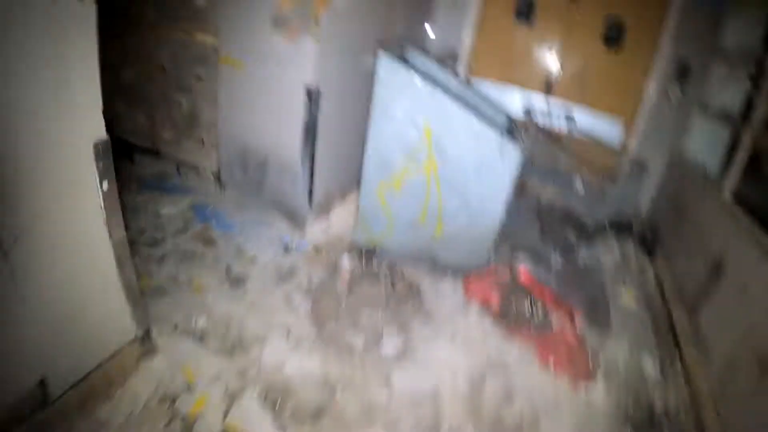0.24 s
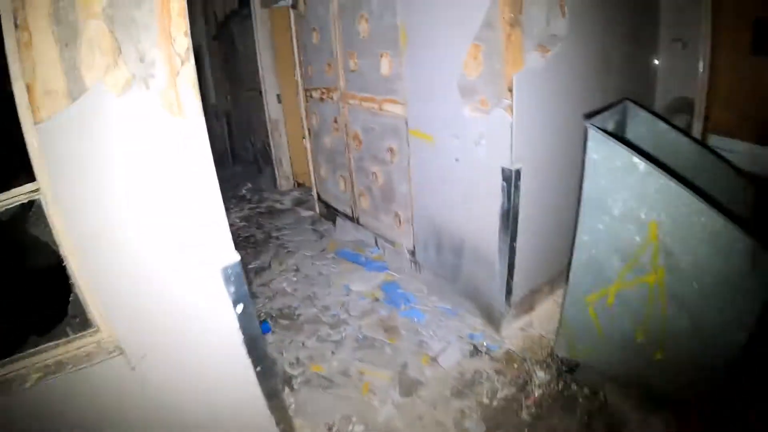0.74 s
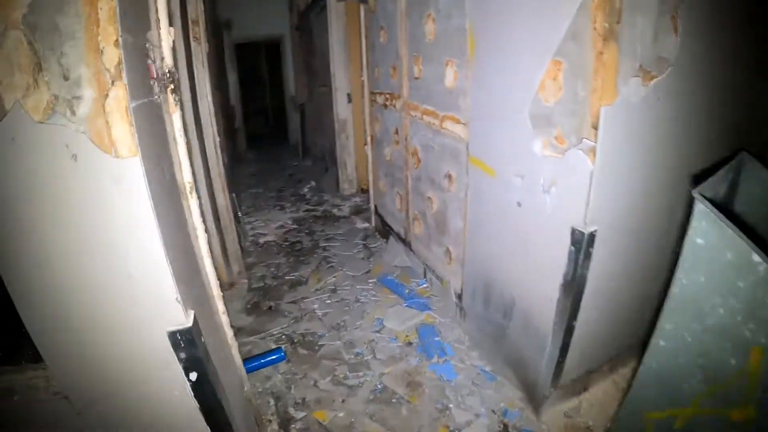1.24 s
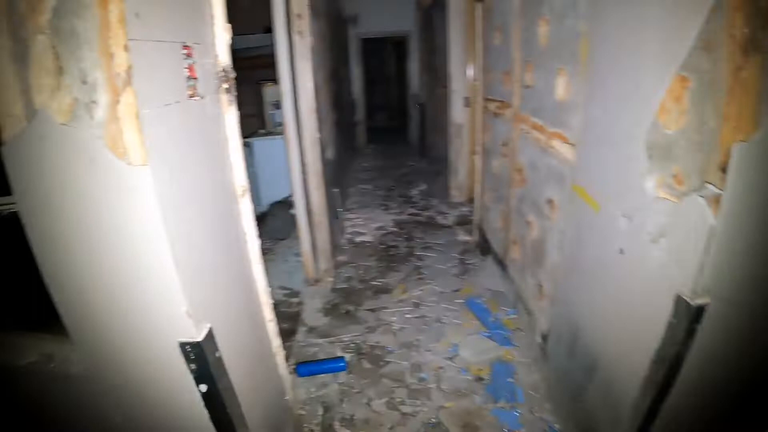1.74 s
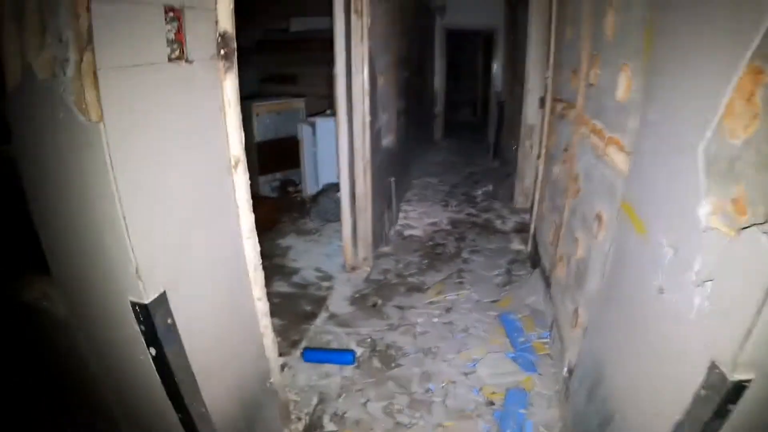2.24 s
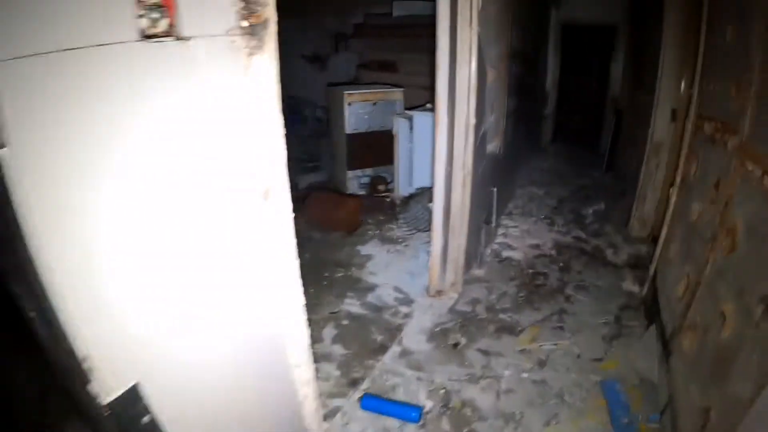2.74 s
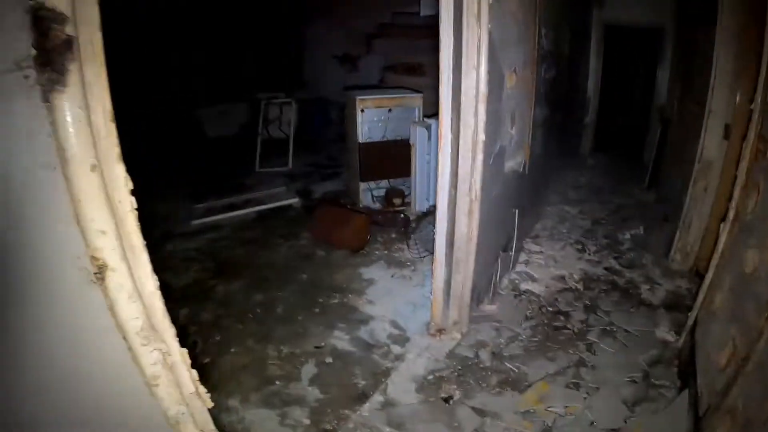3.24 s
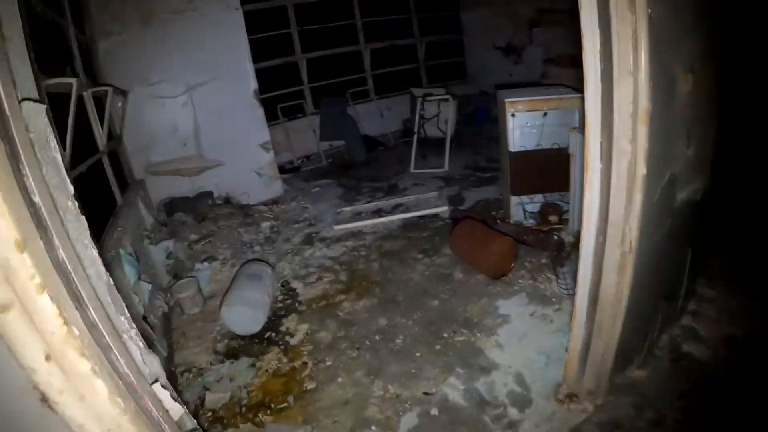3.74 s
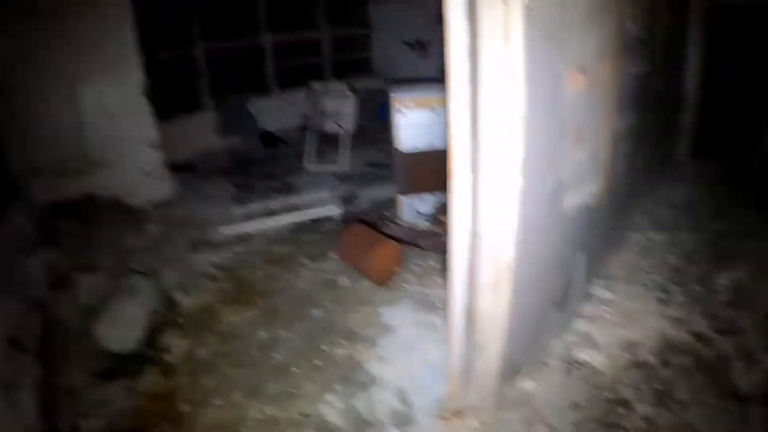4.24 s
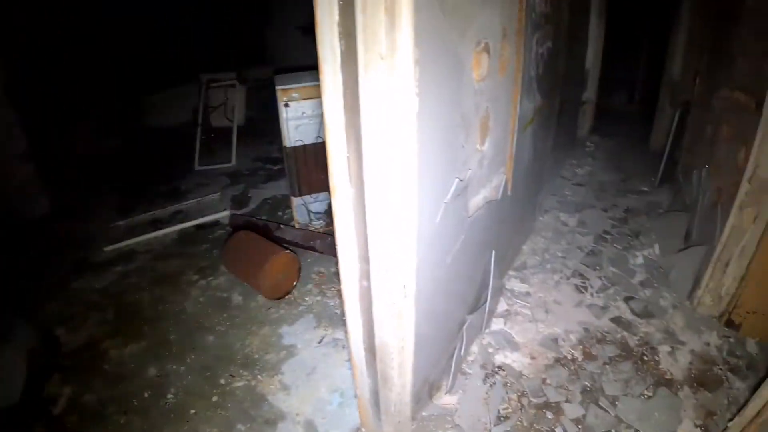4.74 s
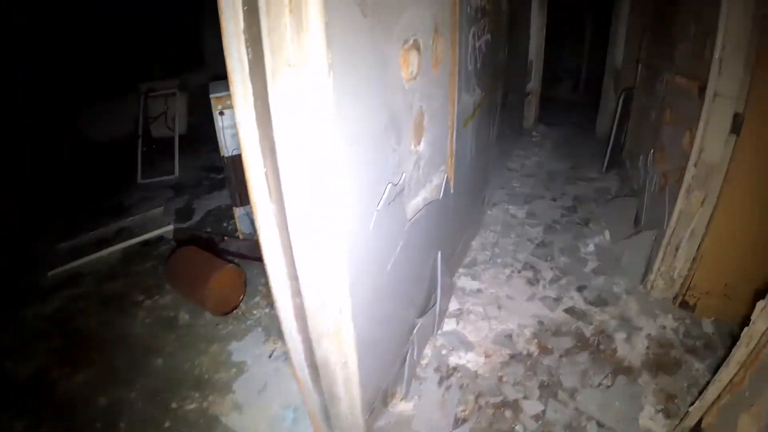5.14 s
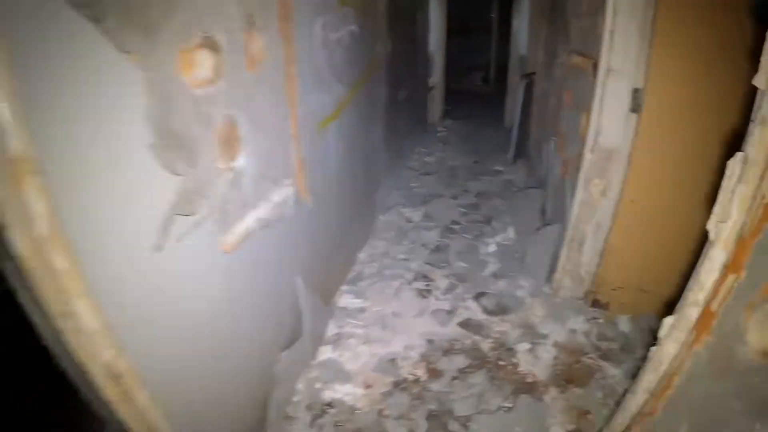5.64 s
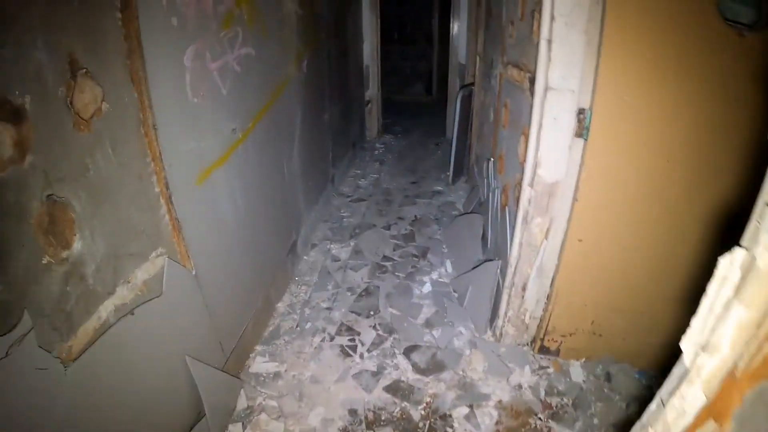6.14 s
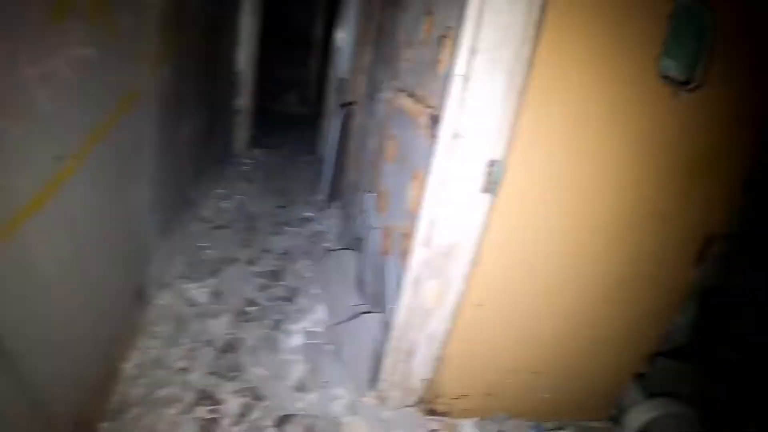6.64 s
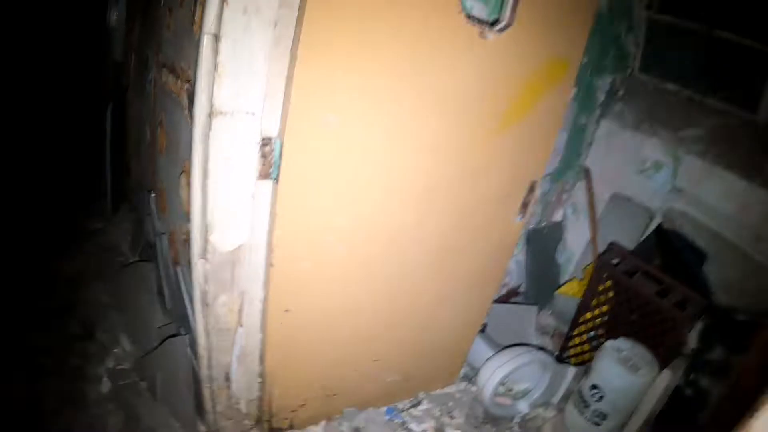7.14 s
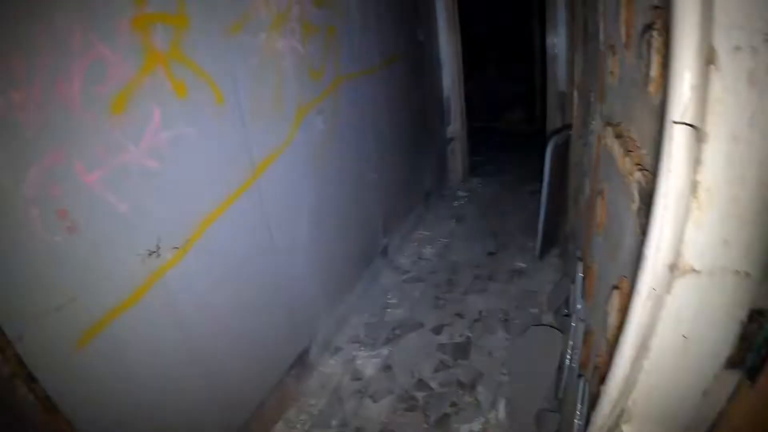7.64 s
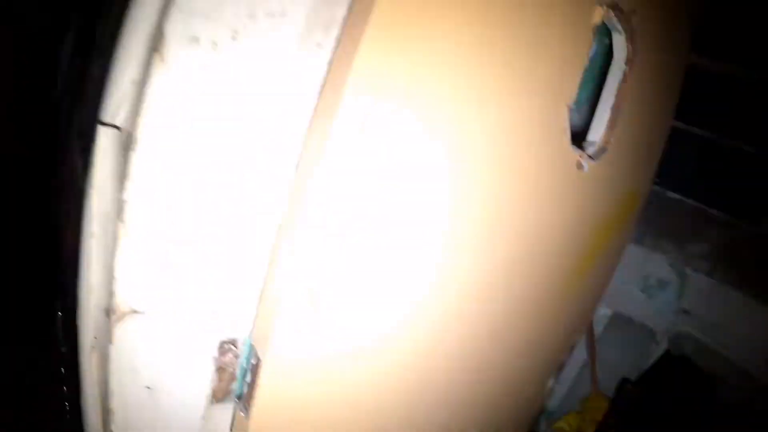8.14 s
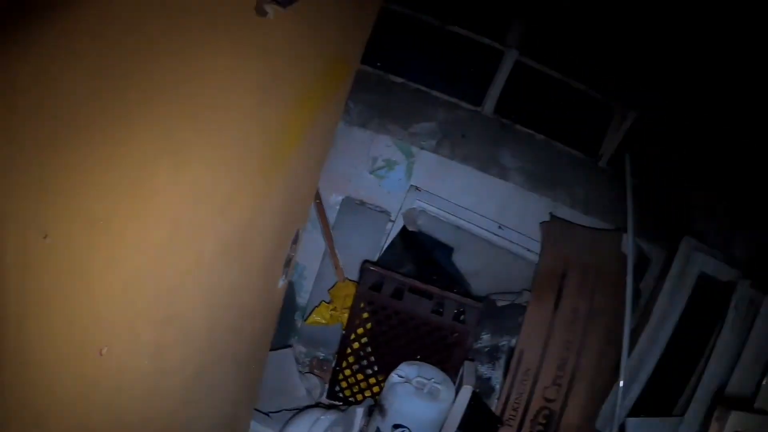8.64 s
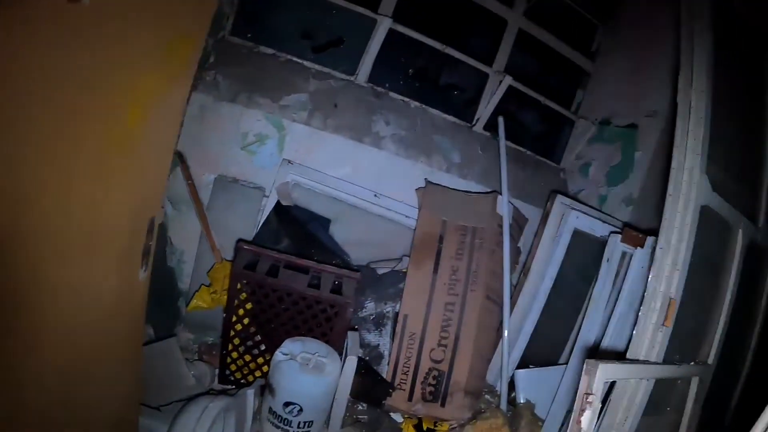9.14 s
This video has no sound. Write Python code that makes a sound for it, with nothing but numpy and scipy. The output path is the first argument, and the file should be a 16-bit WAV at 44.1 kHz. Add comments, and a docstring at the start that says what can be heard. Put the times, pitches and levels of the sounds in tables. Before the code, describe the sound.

Someone walks cautiously through a derelict hallway, debris snapping and scraping underfoot, glass bits clinking, with soft thuds and short hard echoes.

```python
"""A short low hum and a soft scuff open over a lumpy rumble; then someone walks slowly over plaster,
rubble and broken glass in a bare corridor. Lumps crack as filtered bursts of noise, grit crunches as many
tiny ringing snaps, shards ring as dying sines, and fading noise makes the corridor's echo.
The moving hand and air put the rumble on the microphones; thuds carry the weight of the feet."""
import sys
import numpy as np
from scipy import signal
from scipy.fft import rfft, irfft, next_fast_len
from scipy.io import wavfile

SR = 44100
rng = np.random.default_rng(int(sys.argv[2]) if len(sys.argv) > 2 else 0)


def pcm_store(signal):
    """Save signal as 16-bit PCM."""
    levels = np.round(np.clip(np.atleast_2d(signal), -1, 1) * 32767)
    wavfile.write(sys.argv[1], SR, levels.astype(np.int16).T)


def gain_from_db(level_db):
    """Turn a decibel level (scalar or array-like) into a linear amplitude factor."""
    decades = np.asarray(level_db, float) / 20
    return 10 ** decades


N = 413658   # length in samples

# Tone colour of the floor sounds as the microphones hear them: little bass, fading high treble.
# Each row: frequency in Hz, relative level in dB.
FLOOR_COLOUR_AT_MICS = [(180, -47), (300, -38.5), (549, -71), (912, -4), (3370, -8.5), (5420, -7),
                        (7760, -14.5), (8700, -20.5), (10100, -22.5), (14900, -38)]


def rms_one(x):
    """Scales a sound to an rms of 1."""
    return x / np.sqrt(np.mean(x ** 2) + 1e-20)


def at_hz(points, hz):
    """Reads a table of (Hz, value) at any frequency, along a logarithmic pitch scale."""
    table_hz, values = np.transpose(points)
    return np.interp(np.log(hz + 1), np.log(table_hz), values)


def band(x, low_hz, high_hz):
    """Keeps the part between two frequencies."""
    edges = [low_hz, min(high_hz, .45 * SR)]
    return signal.sosfilt(signal.butter(2, edges, "band", fs=SR, output="sos"), x)


def split(x, hz):
    """The parts below and above a frequency."""
    return [signal.sosfilt(signal.butter(4, hz, kind, fs=SR, output="sos"), x) for kind in ("low", "high")]


def coloured(x, spectrum):
    """Filters a sound by a table of (Hz, dB)."""
    length = x.shape[-1]
    size = next_fast_len(length)
    gain = gain_from_db(at_hz(spectrum, np.fft.rfftfreq(size, 1 / SR)))
    return irfft(rfft(x, size) * gain, size)[..., :length]


def drift(rate_hz):
    """A slow random wander of rms about 1: noise smoothed twice, worked out at every 40th sample."""
    r = np.exp(-80 * np.pi * rate_hz / SR)
    noise = rng.standard_normal(N // 40 + 2002)
    slow = signal.lfilter([1], [1, -2 * r, r * r], noise)[2000:]   # drop the filter's start
    return np.interp(np.arange(N) / 40, np.arange(len(slow)), rms_one(slow))


def ring(clicks, hz, t60):
    """Each unit click starts a sine of height 1 that falls 60 dB in t60 seconds."""
    r = gain_from_db(-60 / (t60 * SR))
    w = 2 * np.pi * hz / SR
    return signal.lfilter([0, np.sin(w)], [1, -2 * r * np.cos(w), r * r], clicks + 1e-18)


def pair(side_db):
    """Two channels of noise: a shared middle, plus a side part of opposite sign in each."""
    mid, side = rng.standard_normal((2, N))
    return mid + gain_from_db(side_db) * side * [[1], [-1]]


def presses(rows):
    """Rows of (s, rise s, fall s, dB, ..): a straight rise, a dying fall; one gain curve per dB column."""
    gains = np.zeros((len(rows[0]) - 3, N))
    for s, rise, fall, *db in rows:
        t = np.arange(N - round(s * SR)) / SR
        shape = np.minimum(t / rise, np.exp((rise - t) / fall))
        gains[:, N - len(t):] += gain_from_db(np.array(db))[:, None] * shape
    return gains


def snaps(per_s, spread_db, clump_db, low_hz, cycles):
    """Random snaps in clumps, each ringing down 60 dB in some cycles at one of 24 pitches; rms 1."""
    sizes = gain_from_db(spread_db * np.minimum(rng.exponential(1, N), 5)) * rng.choice([-1, 1], N)
    born = rng.random(N) < per_s * gain_from_db(clump_db * drift(25)) / SR
    pitches = np.geomspace(low_hz, 13000, 24)
    pitches = pitches * gain_from_db(0.11 * rng.standard_normal(24))   # slightly out of step
    dealt = rng.integers(0, 24, N)   # which pitch a snap gets
    total = np.zeros(N)
    for k, hz in enumerate(pitches):
        ringing = ring(sizes * born * (dealt == k), hz, cycles / hz)
        total += rms_one(ringing) * np.sqrt(hz)
    return rms_one(total)


def hums(sag=1.7):
    """Low sine tones that swell, sag and stop within a fifth of a second."""
    # Short hums. Each row: start in seconds, frequency in Hz, level in dB, length in seconds.
    tones = [(0.0, 163, -27, 0.07), (0.075, 329, -35, 0.13), (0.376, 55.2, -24, 0.11),
             (2.027, 97.6, -24.5, 0.16), (5.375, 107, -36.5, 0.12), (5.624, 243.4, -24.5, 0.11),
             (8.514, 315, -29, 0.081)]
    out = np.zeros(N)
    for s, hz, db, length in tones:
        t = np.arange(round(length * SR)) / SR
        shape = np.sqrt(np.sin(np.pi * t / length)) * np.exp(-sag * t / length)
        at = round(s * SR)
        out[at:at + len(t)] += gain_from_db(db) * shape * np.sin(2 * np.pi * hz * t)
    return out


def rumble(lumpy_db=3.0):
    """Moving air and hand shake the microphones: lumpy noise in a deep and an upper band."""
    # Strength of the deep rumble, joined by straight lines. Each row: time in seconds, level in dB.
    strength = [(0.0, -45.5), (0.29, -54.5), (0.42, -30.5), (0.65, -66.5), (1.1, -34), (1.51, -52),
                (2.48, -41.5), (2.59, -63), (2.82, -50.5), (4.23, -64), (4.44, -52), (6.53, -58.5),
                (6.82, -41), (6.87, -54), (8.1, -48.5), (8.15, -38), (9.33, -73.5), (9.38, -58.5)]
    seconds, levels = np.transpose(strength)
    deep_db = np.interp(np.arange(N) / SR, seconds, levels)
    upper_db = -60.5 + 0.11 * (deep_db - deep_db.mean())   # follows a small share of the deep swing
    deep = rms_one(band(band(pair(-13.0), 11, 65), 5, 100))
    upper = rms_one(band(band(pair(-9), 110, 330), 140, 560))
    deep = deep * gain_from_db(deep_db + lumpy_db * drift(9.7))
    return deep + upper * gain_from_db(upper_db + lumpy_db * drift(12.0))


def still_air(level_db=-64):
    """The quiet air of the building: steady coloured noise."""
    # Tone colour of the quiet air. Each row: frequency in Hz, relative level in dB.
    air_colour = [(59, -23), (100, 1.5), (176, 12.5), (731, -21.5), (1000, -0.5), (3450, -18.5),
                  (7170, -19.5), (14900, -48)]
    return gain_from_db(level_db) * rms_one(coloured(pair(-8.0), air_colour))


def thuds(rise_s=0.016):
    """The floor booms and the rubble knocks dully under the body's weight: two bands of swelling noise."""
    # The foot coming down. Each row: start in seconds, fall in seconds, boom level in dB, knock level in dB.
    steps = [(0, 0.096, -37, -56.5), (.41, 0.11, -52, -48), (0.951, 0.24, -45.5, -41),
             (1.06, 0.12, -34.5, -40), (1.675, 0.12, -40, -26.5), (1.995, 0.095, -30.5, -32.5),
             (2.3, 0.14, -43, -56), (2.732, 0.16, -41.5, -49.5), (3.48, 0.15, -42, -55),
             (3.695, 0.038, -55, -30), (4.37, 0.082, -51, -55.5), (4.62, 0.098, -44, -41),
             (5.6, 0.095, -33.5, -42), (6.769, 0.036, -41.5, -51), (7.465, 0.069, -55, -41),
             (8.09, 0.29, -46, -68), (8.799, 0.11, -47, -45.5)]
    boom, knock = presses([(s, rise_s, fall, boom_db, knock_db) for s, fall, boom_db, knock_db in steps])
    boom_noise = rms_one(band(band(pair(-19.0), 100, 299), 98, 660))
    knock_noise = rms_one(band(pair(-15.0), 130, 1100))
    return boom * boom_noise, knock * knock_noise


def grit(splinter_db=-4, dust_db=-12, pebble_db=1.5, firm_db=-47, sole_db=-12.5):
    """Crumbs snap, pebbles click, splinters tinkle; a light scuff stirs mostly dust, a firm one breaks grains."""
    # Soles pressing and sliding in the grit. Each row: start in seconds, rise in seconds,
    # fall in seconds, level in dB, treble in dB relative to that level.
    scuffs = [(0, 0.003, 0.082, -51, 1.5), (0.208, 0.024, 0.25, -48, -5), (.38, 0.065, .18, -48.5, -3.5),
              (.712, 0.013, 0.11, -46, -3.5), (0.938, 0.043, 0.12, -47, 7.5), (1.05, 0.059, 0.15, -37, -11),
              (1.54, 0.011, 0.41, -58, 0), (1.673, 0.0062, 0.12, -39.5, 2.5), (2, 0.0025, 0.09, -27, -53),
              (2.732, 0.018, 0.076, -60, -4), (2.868, 0.0029, 0.072, -41, -10.5), (3.1, 0.16, 1, -64.5, -4),
              (3.453, 0.066, 0.18, -30.5, -9), (4.125, 0.0093, 0.081, -34, -9.5),
              (4.299, 0.073, 0.17, -31.5, -7.5), (4.55, 0.094, 0.19, -35.5, -8),
              (5.26, 0.02, 0.54, -58.5, -6), (5.586, 0.033, 0.032, -27.5, 2),
              (5.729, 0.048, 0.067, -22, -8.5), (5.95, 0.026, 0.28, -36.5, -8.5),
              (6.546, 0.016, 0.039, -44, 4.5), (6.671, 0.015, 0.046, -41, -3.5),
              (7.149, 0.067, 0.43, -69, 0.5), (7.368, 0.018, 0.13, -44, 4), (8.198, 0.2, 0.054, -46.5, 2),
              (8.61, 0.0053, 0.073, -47, 5), (8.803, 0.0034, 0.088, -29.5, -6.5)]
    crumbs = snaps(per_s=2500, spread_db=3.5, clump_db=4.0, low_hz=477.5, cycles=18.0)
    splinters = snaps(per_s=91, spread_db=5.5, clump_db=4.0, low_hz=2524, cycles=500.0)
    pebbles = snaps(per_s=350, spread_db=2.5, clump_db=4.0, low_hz=1151.3, cycles=80.0)
    grains = crumbs + gain_from_db(splinter_db) * splinters + gain_from_db(pebble_db) * pebbles
    pressure = presses([(s, rise, fall, db, db + treble_db, db + sole_db)
                        for s, rise, fall, db, treble_db in scuffs])
    firm = pressure[0] / (pressure[0] + gain_from_db(firm_db))   # 0 = light, near 1 = firm
    dust = (1 - firm + gain_from_db(dust_db)) * pair(2.3)
    low, high = split(coloured(firm * grains + dust, FLOOR_COLOUR_AT_MICS), 2400)
    sole = band(band(pair(-16.0), 130, 1100), 130, 2000)   # dull body of the scuff
    return sum(rms_one(part) * gain for part, gain in zip((low, high, sole), pressure))


def cracks(burst_s=0.0037, ring_db=-4, crush_db=-4, crush_follows=0.25, chip_db=-5, big_chip_db=-5.0,
           snap_db=-11, pan_db=1.94):
    """A break is a burst of a few ms: a broad snap, the short ring of the lump and chips clinking above."""
    # Lumps that break or knock. Each row: start in seconds, level in dB, pitch in Hz of the clearest ring
    # (the lump's if low, a chip's if high), treble in dB relative to the level.
    lumps = [(1.062, -18, 754, -15.5), (1.098, -13, 845, -15), (1.118, -13.5, 1050, -24.5),
             (1.135, -13, 4460, 3), (1.684, -24, 3050, -8), (2.003, -9.5, 1000, -29),
             (2.047, -17.5, 1010, -26), (2.869, -23, 2170, -3.5), (2.9, -26.5, 2200, -13),
             (2.942, -33.5, 1793, 2.5), (3.483, -12.5, 1180, -13), (3.49, -8.5, 2900, -16),
             (3.527, -5, 916, -15), (3.562, -7, 856, -11), (3.581, -10.5, 4540, -2),
             (3.594, -7, 917, -26.5), (3.709, -19, 850, -7), (3.728, -24.5, 990, -6), (3.873, -30, 2700, 0),
             (4.126, -8, 1085, -13), (4.329, -11, 2900, -6), (4.39, -10.5, 1420, -3.5),
             (4.425, -8.5, 1330, -8), (4.492, -17.5, 926, 1.5), (4.574, -23.5, 3830, 1.5),
             (4.602, -15, 4280, 3), (4.654, -15, 4050, 1.5), (4.691, -12, 1194, -31),
             (4.771, -19.5, 1418, -7.5), (4.817, -27.5, 1940, -2.5), (5.075, -50.5, 4330, 5.5),
             (5.383, -42.5, 5530, 5), (5.432, -26, 2200, -11.5), (5.61, -15.5, 4400, -0.5),
             (5.63, -7.5, 1500, -4.5), (5.693, -18.5, 5440, -8), (5.898, -19, 2370, 4.5),
             (5.999, -20, 2480, 0.5), (6.056, -24, 3940, 5), (6.117, -21.5, 3900, -9.5),
             (6.155, -30.5, 3580, -2.5), (6.3, -29, 3940, -4.5), (6.477, -35.5, 4730, 3),
             (6.691, -22, 994, -9.5), (6.775, -36.5, 4710, 7.5), (6.803, -29, 2530, -2),
             (7.385, -29.5, 2820, 5.5), (7.471, -6.5, 980, -9.5), (8.214, -39, 4360, 4),
             (8.35, -14, 900, -11), (8.412, -19.5, 927, -22), (8.504, -27.5, 4270, -0.5),
             (8.613, -27, 5200, 4.5), (8.8025, -10.5, 1080, 4)]
    size, lump_cycles, chip_cycles = 3000, 32, 70   # samples; cycles in which a ring falls 60 dB
    out = np.zeros((2, N))
    t = np.arange(size) / SR
    for s, db, hz, treble_db in lumps:
        noise = rng.standard_normal(size)
        drag, bulk, *chips = rng.random(6)
        lasts = burst_s * (.5 + drag)     # some lumps snap clean, some crumble
        burst = noise * t / lasts * np.exp(-2.5 * t / lasts)
        coloured_burst = coloured(burst, FLOOR_COLOUR_AT_MICS)
        low, high = split(coloured_burst, 3570)
        small_chips_hz = 2000 * 3.7 ** np.array(chips)
        clink = sum(ring(coloured_burst, chip_hz, chip_cycles / chip_hz) for chip_hz in small_chips_hz)
        if hz < 1800:
            lump_hz, big_chip_hz = hz, 2000 * 1.5 ** bulk
        else:
            lump_hz, big_chip_hz = 1100 * 1.35 ** bulk, hz
        lump = ring(burst, lump_hz, lump_cycles / lump_hz)
        big_chip = ring(burst, big_chip_hz, chip_cycles / big_chip_hz)
        parts = [(lump, ring_db), (low, crush_db + crush_follows * treble_db),
                 (big_chip, treble_db + big_chip_db), (high, treble_db + snap_db), (clink, treble_db + chip_db)]
        sound = sum(gain_from_db(part_db) * part / np.abs(part).max() for part, part_db in parts)
        sides_db = pan_db * noise[0] * np.array([[1], [-1]])   # a random lean to one side
        at = round(s * SR)
        out[:, at:at + size] += (gain_from_db(db + sides_db) * sound)[:, :N - at]
    return split(out, 592)[1]     # the breaks carry no bass


def shards(ring_share=.26, rattle_db=0.5, uneven_db=1.5):
    """A blow strikes all modes of its group, which ring briefly and are kept sounding by a dying rattle."""
    # Ringing glass: one list of modes per group of rings; a bouncing shard may use several groups.
    # Each row: frequency in Hz, level in dB, time in seconds for the rattle to fall 60 dB.
    ring_groups = [
        [(2126, -2, .22), (3085, -6, .3), (4560, -2, .28), (5852, -16, .3), (6912, -12, .25)],
        [(6632, 0, .4)],
        [(996, -5, .4), (1755, -6, .35), (2105, 1, .5), (2848, -11, .45), (4016, -13, .5), (4511, -8, .33),
         (4786, -13, .45), (5889, -16, .38), (6934, -12, .33)],
        [(5346, 0, 0.2), (7725, -14, 0.2), (10150, -17, 0.13)],
        [(1389, 0, .35), (2560, -2, .2), (3640, -2, .2)],
        [(5959, 0, .3), (7391, -3, .4)],
        [(4000, 0, .25), (2482, -4, .25)],
        [(960, 0, .5)],
        [(1350, 0, .25)],
        [(3550, 0, .3), (4000, 0, .3), (5900, -4, .2), (6800, -8, .2)],
        [(1093, -2, .55), (1669, -7, .5), (2751, -11, .45), (3580, -4, .4), (6212, -3, .3), (7009, -6, .4),
         (7494, -11, .4), (9733, -20, .3), (10440, -20, .2)],
    ]
    # One list of blows per group of rings, in the same order. Each row: time in seconds, level in dB.
    group_blows = [
        [(1.1325, -29.5)],
        [(1.233, -37)],
        [(2.003, -34), (2.047, -31)],
        [(5.694, -18)],
        [(5.611, -32.5), (5.9005, -27.5)],
        [(5.9983, -39), (6.1185, -51.5)],
        [(6.0561, -33), (6.119, -34.5), (6.1554, -39), (6.3001, -45.5)],
        [(7.471, -27.5), (8.351, -39)],
        [(2.727, -45.5)],
        [(4.775, -38)],
        [(8.803, -30.5)],
    ]
    out = np.zeros(N)
    for modes, blows in zip(ring_groups, group_blows):
        s, db = np.transpose(blows)
        at, size = int(s[0] * SR), int((s[-1] - s[0] + 1) * SR)
        for hz, level_db, t60 in modes:
            clicks = np.zeros(size)
            unevenness = uneven_db * rng.standard_normal(len(s))
            clicks[(s * SR).astype(int) - at] = gain_from_db(db + level_db + unevenness)
            dying = signal.lfilter([1], [1, -gain_from_db(-60 / (t60 * SR))], clicks + 1e-18)
            ring_s = ring_share * t60   # a bare ring dies sooner than the rattle
            rattle = dying * rng.standard_normal(size) * gain_from_db(rattle_db) * np.sqrt(10 / (ring_s * SR))
            out[at:at + size] += ring(2 * clicks + 2 * rattle, hz, ring_s)[:N - at]
    return out


def corridor(x, gap_s=0.0022, side_db=-5.0):
    """Dense echoes, dying soonest in the high treble, a little different at each microphone."""
    # How long the echo lasts. Each row: frequency in Hz, time in seconds to fall 60 dB.
    echo_times = [(300, 0.65), (1000, 0.49), (3000, 0.51), (7000, 0.38), (12000, 0.3)]
    t = np.arange(SR) / SR
    edges = np.geomspace(100, 16000, 9)
    noise = pair(side_db)[:, :SR]
    tail = np.zeros((2, SR))
    for low, high in zip(edges, edges[1:]):
        t60 = at_hz(echo_times, np.sqrt(low * high))
        tail += band(noise, low, high) * gain_from_db(-60 * t / t60)
    tail = tail * np.clip(t / gap_s - 1, 0, 1)   # a short gap, then an equally short rise
    tail = tail / np.sqrt(np.sum(tail ** 2) / 2)
    return signal.fftconvolve(x[None], tail, axes=1)[:, :N]


def scene():
    """Debris and knocks echo in the corridor; boom, rumble, hums and still air are added without echo."""
    boom, knock = thuds()
    broken = cracks() + grit() + knock
    rung = shards()
    echoes = corridor(gain_from_db(-5.5) * broken.mean(axis=0) + gain_from_db(-7.5) * rung)
    balance = gain_from_db([[.6], [-.6]])   # dB: first channel a little louder
    return balance * (broken + rung + echoes) + boom + rumble() + hums() + still_air()


def band_limit(x):
    """A steep low-pass at the top of the band."""
    return signal.sosfilt(signal.butter(12, 15080, fs=SR, output="sos"), x)


def record(dry):
    """Turns the finished mix into the sound that is written out."""
    return band_limit(dry)


dry = scene()
out = record(dry)
pcm_store(out)
```